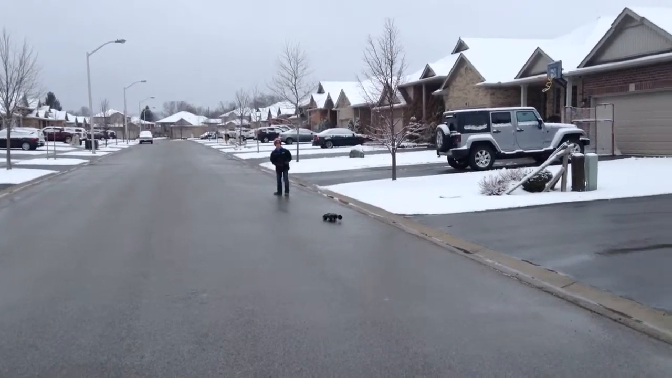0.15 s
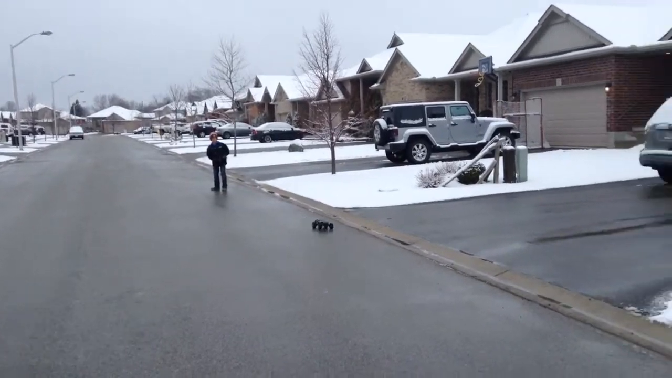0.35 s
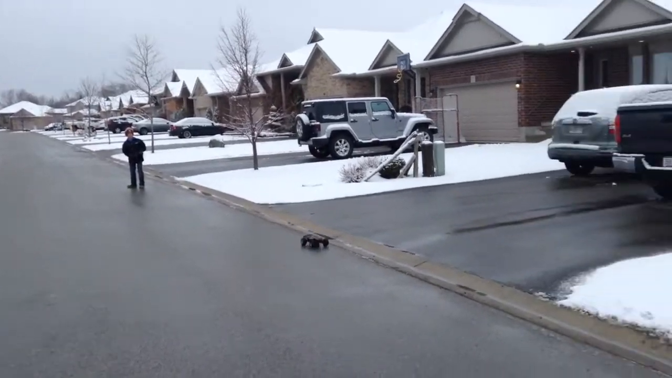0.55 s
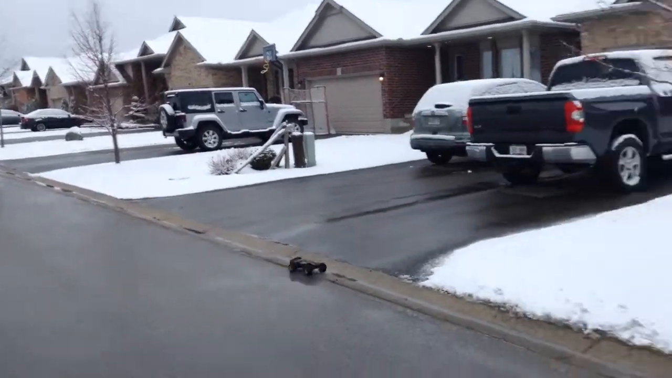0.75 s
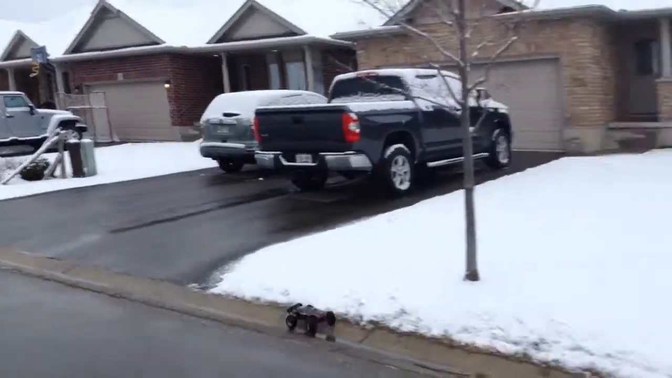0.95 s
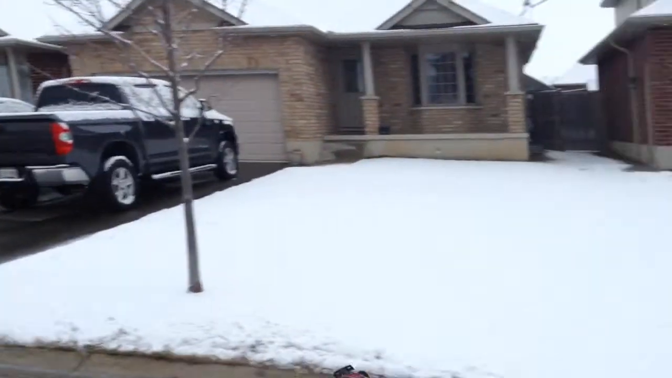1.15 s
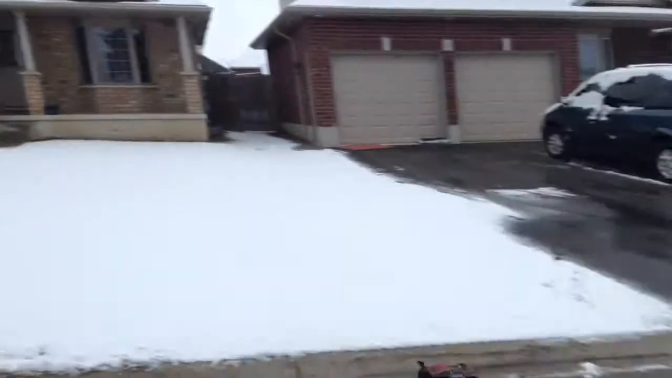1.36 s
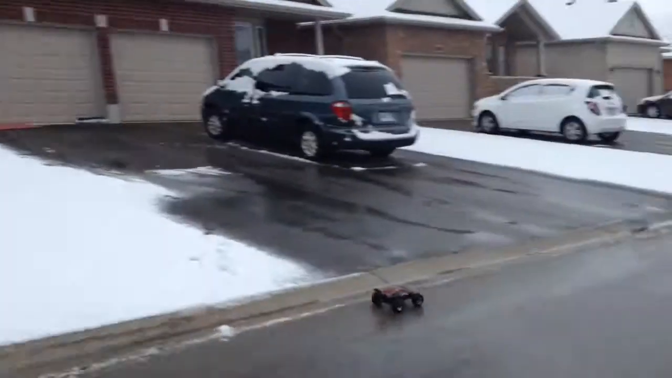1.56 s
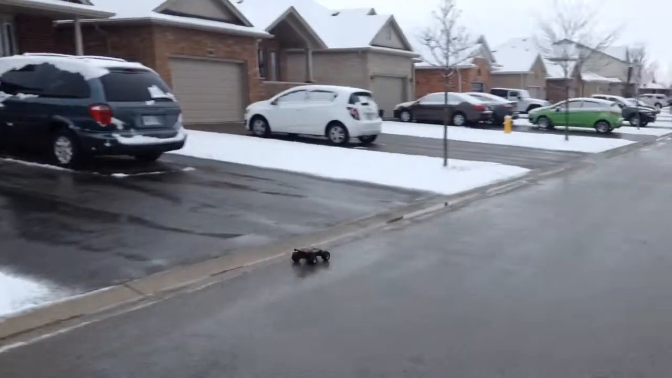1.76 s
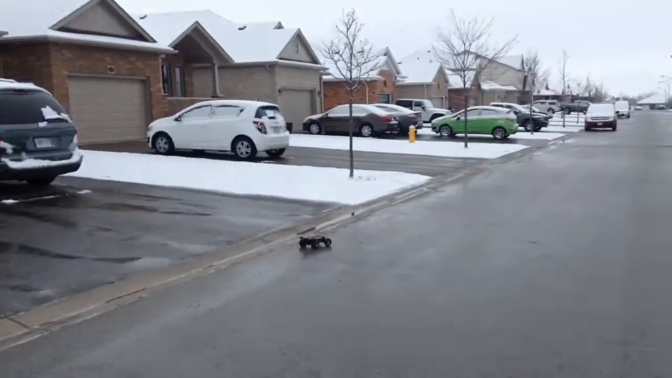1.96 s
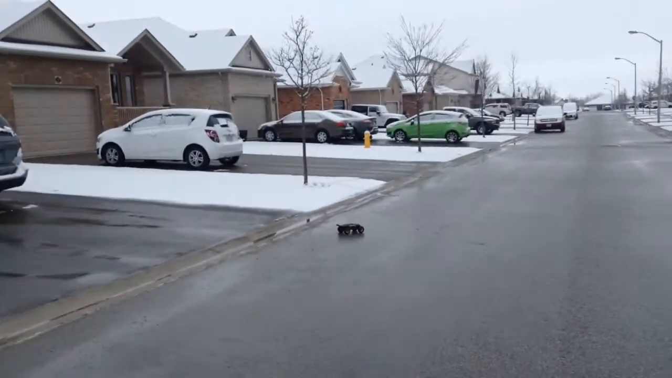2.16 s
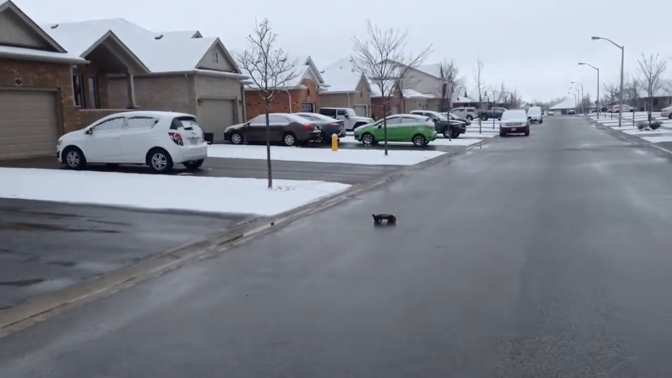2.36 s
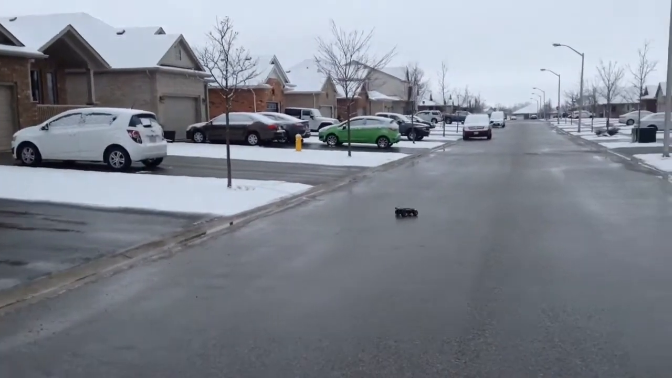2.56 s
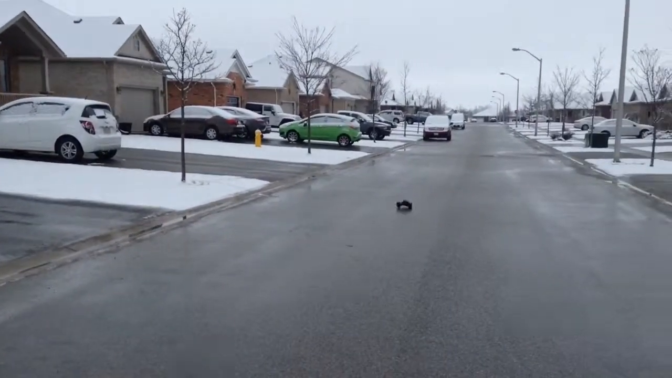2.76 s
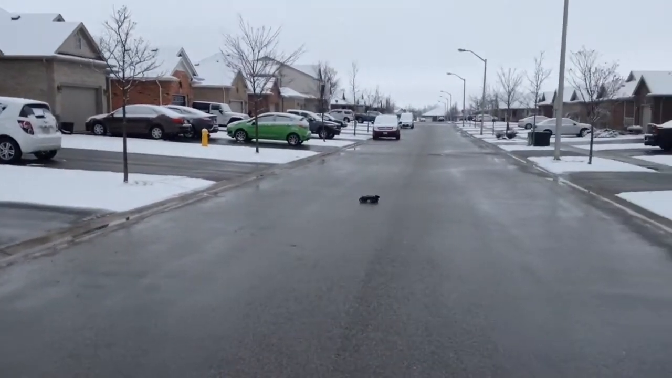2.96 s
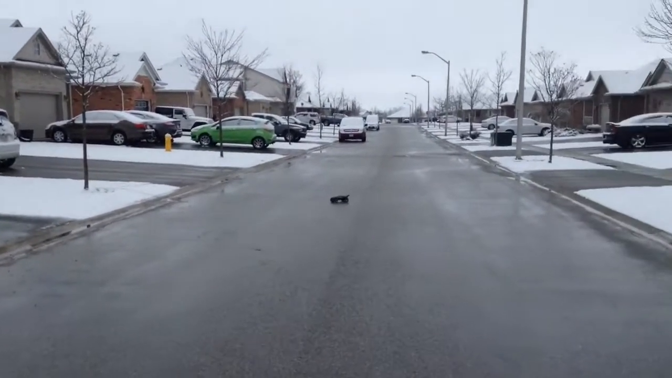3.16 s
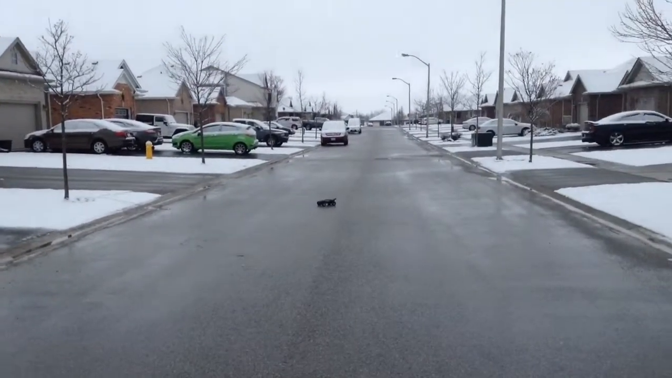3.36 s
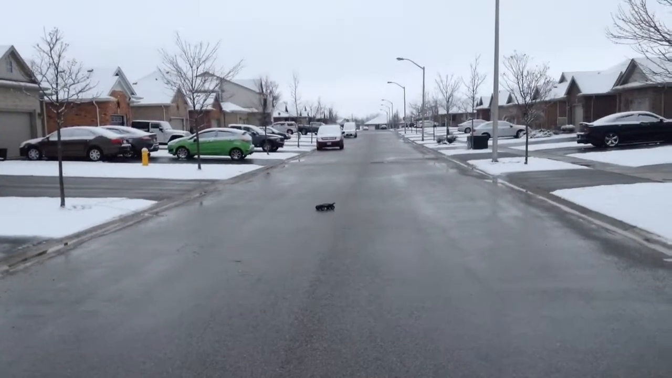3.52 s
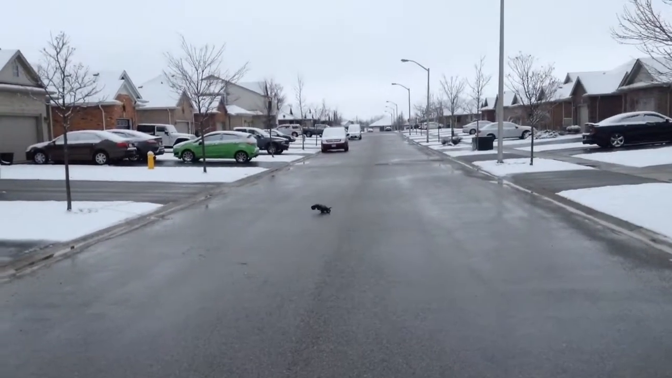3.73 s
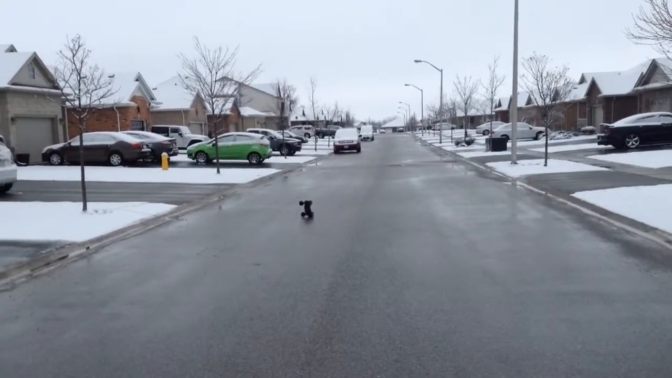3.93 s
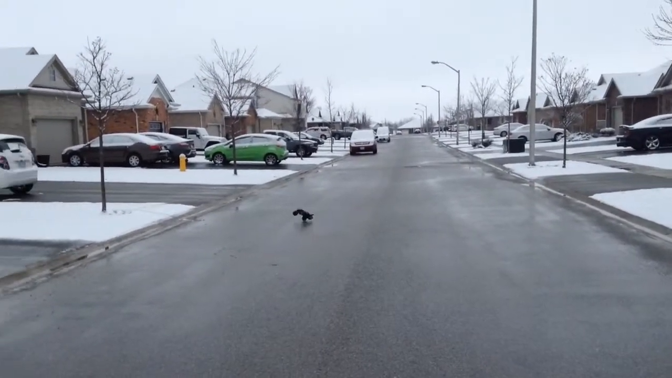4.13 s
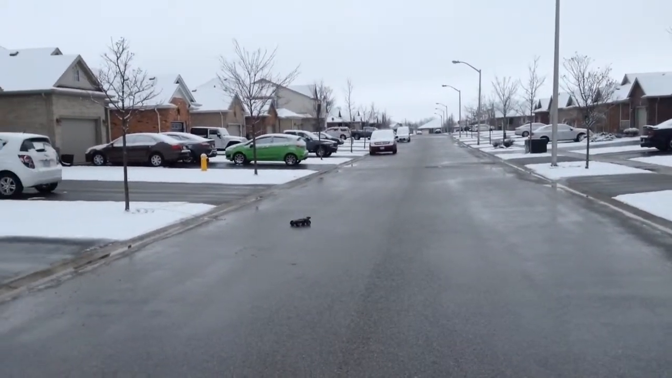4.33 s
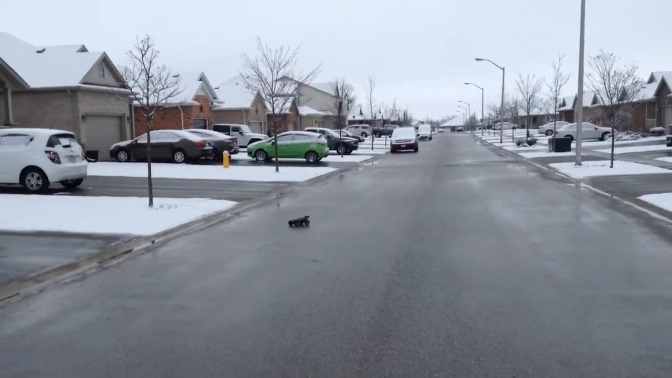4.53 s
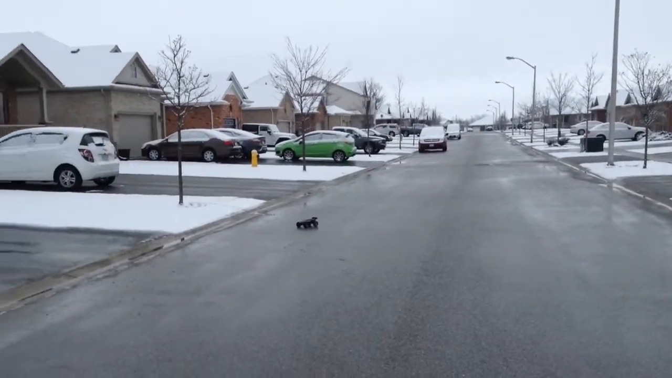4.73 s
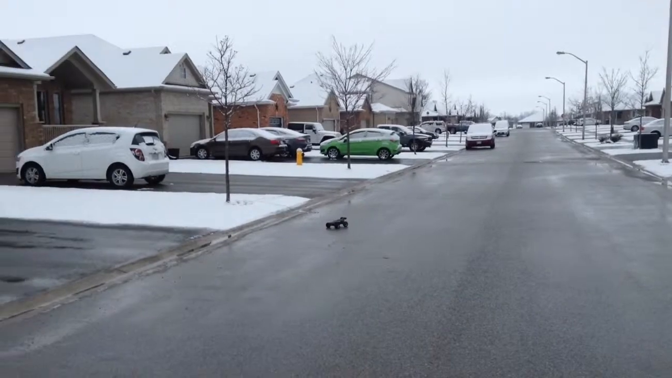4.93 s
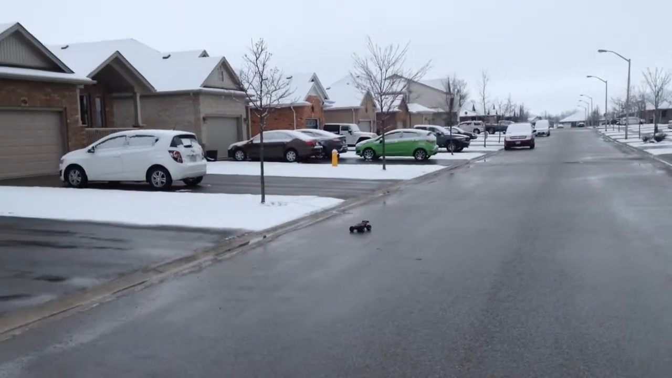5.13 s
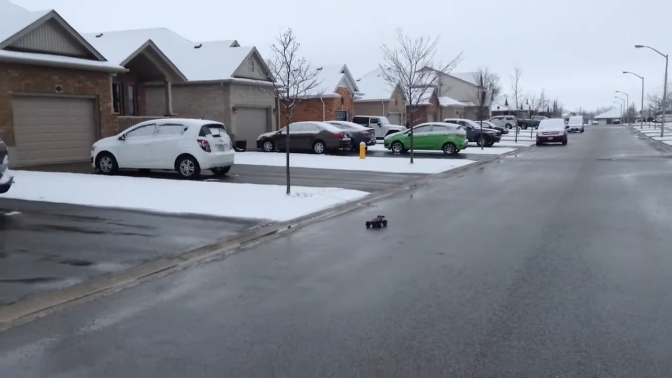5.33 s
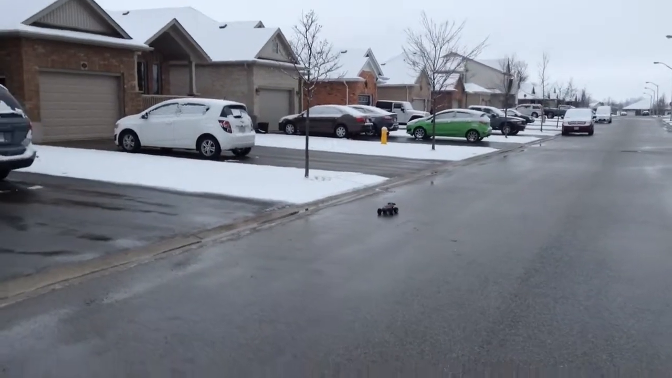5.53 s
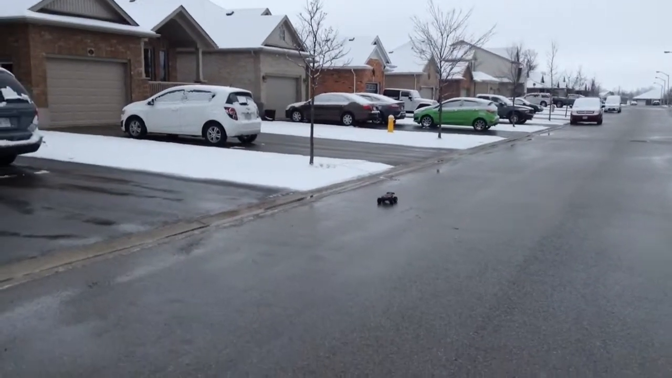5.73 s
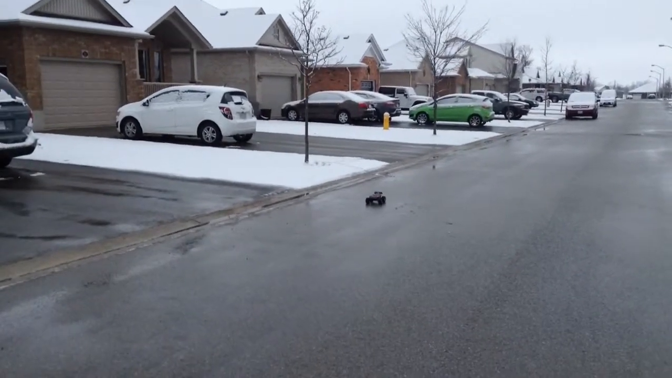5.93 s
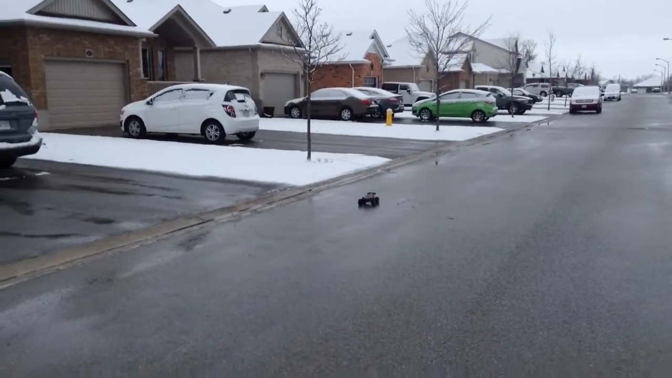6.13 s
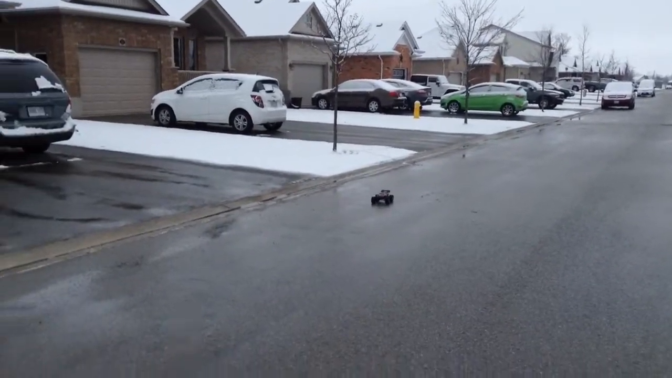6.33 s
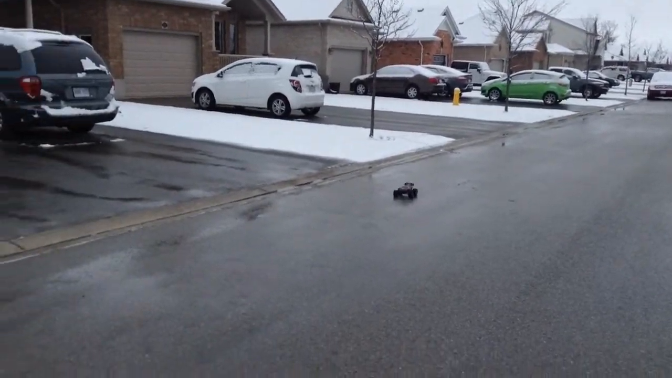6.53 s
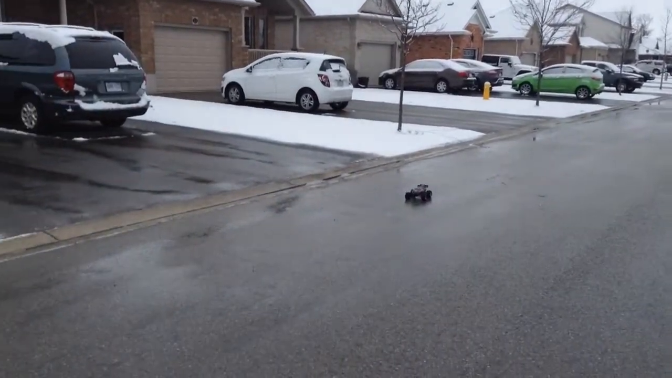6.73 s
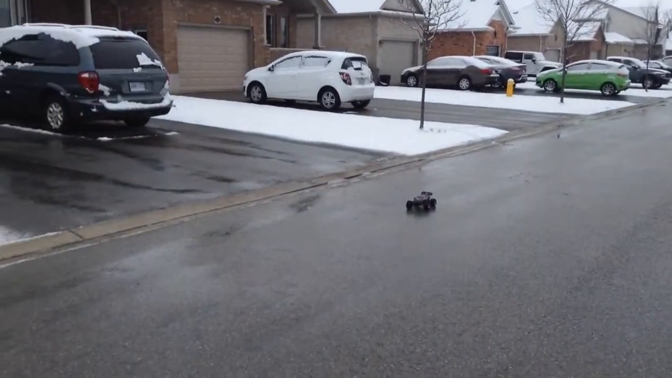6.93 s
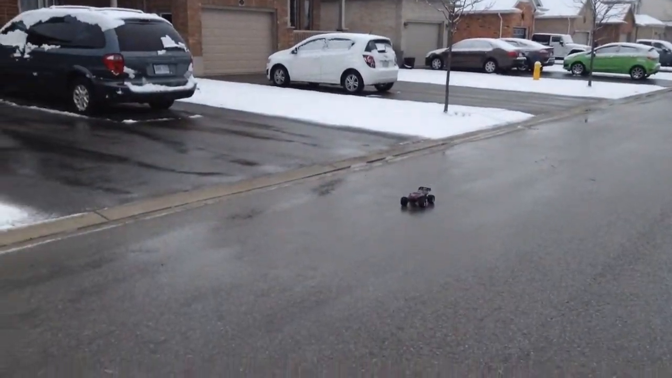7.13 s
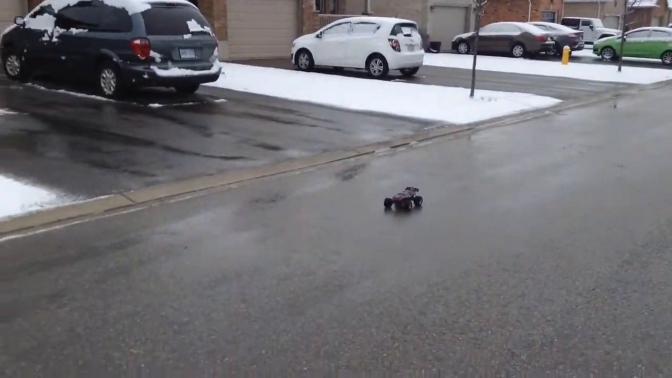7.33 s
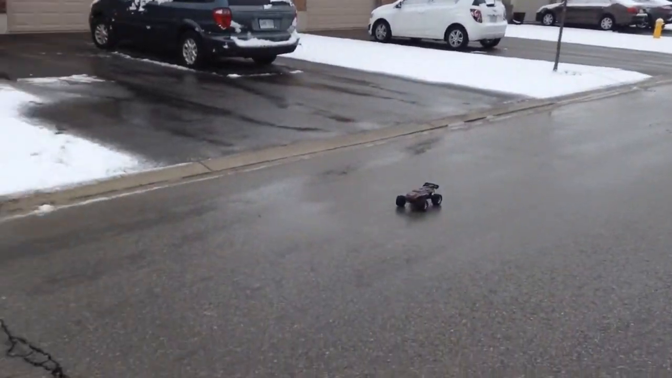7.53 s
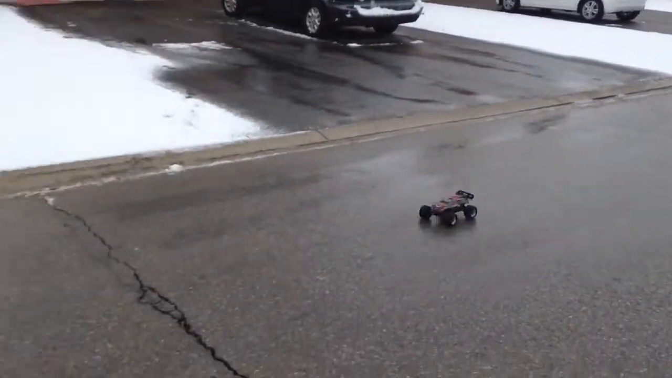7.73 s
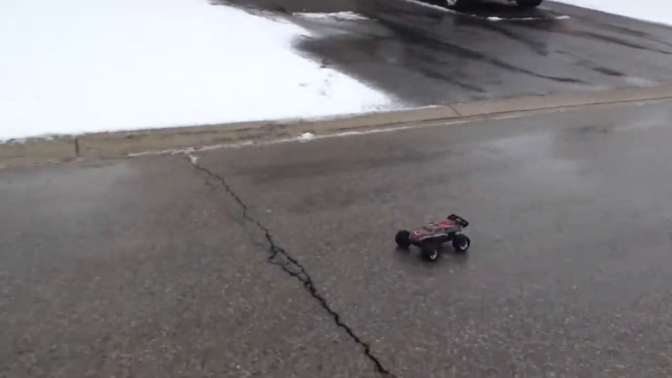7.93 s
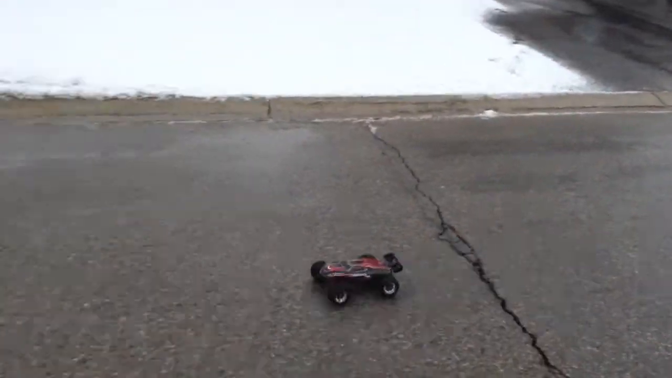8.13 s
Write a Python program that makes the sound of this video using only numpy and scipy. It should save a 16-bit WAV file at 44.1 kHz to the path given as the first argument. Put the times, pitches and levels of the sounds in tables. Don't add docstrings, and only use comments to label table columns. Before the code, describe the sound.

On a quiet snowy street, a small electric toy truck approaches with a high gear whine, plastic rattle and tyre hiss, and rushes past close with knocks and a wind thump. It coasts away, whine sinking, nearly silent. A sharp motor burst and thud follow, faint squeaks and ticks, then it races back with rising pitch, ending loud. Small mono microphone, little bass.

```python
import sys
import numpy as np
from scipy import signal
from scipy.fft import rfft, irfft
from scipy.io import wavfile
from scipy.ndimage import uniform_filter1d

SR = 44100
rng = np.random.default_rng(int(sys.argv[2]) if len(sys.argv) > 2 else 0)


def to_linear_factor(level_db):
    exponent = np.asarray(level_db, float) / 20
    return 10 ** exponent


def to_wav(sig):
    pcm = np.clip(np.atleast_2d(sig), -1, 1) * 32767
    pcm = np.round(pcm).astype(np.int16)
    wavfile.write(sys.argv[1], SR, pcm.T)


N = 360738

RATIO = 2.75
MOTOR_ORDERS = [1, 2, 3, 4]
# (level at the knee pitch [dB], slope below it [dB/octave],
# slope above it [dB/octave], blur factor)
MOTOR_SHARES = [(0, 0, 0, 1), (-1, 1.5, -15, 1.1), (-3, -2, -26, 1.3), (-3, 0, -26, 1.3)]


def evened(x):
    return x / np.sqrt(np.mean(abs(x) ** 2) + 1e-20)


def read(points, hz):
    f, value = np.transpose(points)
    return np.interp(np.log(hz + 1), np.log(f + 1), value, -99, -99)


def add(mix, s, sound):
    part = mix[round(s * SR):][:len(sound)]
    part += sound[:len(part)]


def between(t, start, end, size):
    return uniform_filter1d(1. * (t > start) * (t < end), size=size)


def around(t, middle, half):
    return np.exp(-((t - middle) / half) ** 4)


def drift(count, hz):
    r = np.exp(-np.pi * hz / SR)
    chance = rng.standard_normal((count, 2)) @ [1, 1j]
    return evened(signal.lfilter([1], [1, -2 * r, r * r], chance))


def hiss(shape_db, patchy_db):
    a, b, patches = rng.standard_normal((N // 128 + 5, 257, 3)).T
    patches = uniform_filter1d(patches, size=6, axis=0)
    patches = evened(uniform_filter1d(patches, size=16, axis=1))
    z = (a + 1j * b) * to_linear_factor(shape_db[:, None] + patchy_db * patches)
    return evened(signal.istft(z, nperseg=512, noverlap=384)[1][:N])


def bumps(rows, length, octaves, trim_db):
    out, hz, t = np.zeros(N), np.fft.rfftfreq(4096, 1 / SR), np.arange(4096) / SR
    u = t / length
    swell = np.tanh(3 * u) * np.exp(-u ** 2)
    for (s, db, f), noise in zip(rows, rng.standard_normal((len(rows), 4096))):
        band = np.exp(-(np.log2((hz + 9) / f) / octaves) ** 2 - (hz / 11000) ** 4)
        puff = evened(irfft(rfft(noise) * band))
        add(out, s - 0.1 * length, to_linear_factor(db + trim_db) * puff * swell)
    return out


def street():
    # (frequency [Hz], level [dB per Hz])
    wash_shape = [(24, -54), (40, -21.5), (234, 1.5), (323, -31), (632, -30), (873, -4), (1040, -22),
                  (1890, -13.5), (2250, -2), (3880, -20.5), (4390, -17.5), (5500, -20.5), (15200, -27)]
    hum_hz, hum_db = 241, -75
    wash_db = -73 + 2.7 * drift(N, hz=24.9).real
    wash = hiss(read(wash_shape, np.fft.rfftfreq(512, 1 / SR)), patchy_db=5.5) * to_linear_factor(wash_db)
    return wash + to_linear_factor(hum_db) * np.sin(2 * np.pi * hum_hz * np.arange(N) / SR)


def wind():
    # (time [s], peak [dB], centre [Hz])
    puffs = [(1.104, -15.5, 220), (1.584, -34, 207), (1.615, -30, 153), (1.689, -23.5, 187),
             (3.52, -52, 120), (3.552, -58, 150), (4.33, -58.5, 240.4), (4.985, -56.5, 260),
             (5.92, -45, 290), (5.957, -39, 282), (6.645, -57, 190), (6.69, -49, 300), (7.331, -59, 90),
             (8.15, -26, 299)]
    return bumps(puffs, .011, octaves=.6, trim_db=-5)


def shell(hz):
    # (centre [Hz], width [Hz], gain [dB])
    body = [(534, 67, 8), (950, 280, 3.5), (1550, 160, 4.5), (1958, 120, 5.5), (3544, 120, 2.5),
            (4760, 1700, 5), (5910, 210, 1)]
    return sum(db / (1 + (2 * (hz - f) / width) ** 2) for f, width, db in body)


def rolling_levels(t):
    # (time [s], wheel speed as heard [dB], weight on the road as heard [dB])
    roll_past = [(0.0, -31, -38), (0.25, -26, -37.5), (0.55, -23.5, -35), (0.98, -18.5, -27),
                 (1.13, -14, -27), (1.165, -21, -32.5)]
    roll_away = [(1.298, -26, -22.5), (1.8, -31, -37.5), (2.3, -36.5, -36.5), (2.65, -44.5, -41),
                 (2.98, -41, -39.5), (3.14, -52, -43.5), (3.27, -64, -53.5), (3.36, -85, -53)]
    roll_burst = [(3.6, -100, -61), (3.62, -64, -55.5), (3.75, -35.5, -45.5), (3.9, -28.5, -39),
                  (4.025, -32, -24), (4.055, -39.5, -31), (4.23, -56, -54), (4.5, -61, -50.5),
                  (5.1, -66.5, -52)]
    roll_back = [(5.66, -74.5, -56.5), (5.69, -55.5, -53), (5.99, -38, -46.5), (6.97, -39, -42),
                 (7.29, -30.5, -39.5), (7.61, -20.5, -36), (7.9, -20, -30.5), (8.18, -15.5, -23.5)]
    # (middle [s], half length [s], wheels [dB], road [dB], rattle
    # [dB])
    swells_and_dips = [(0.874, 0.027, 3.5, 1.5, -2), (1.088, 0.029, 1, 3.5, -0.5), (1.239, 0.032, 6.5, -2, 2.5),
                       (1.347, 0.071, 4, -5.5, -0.5), (1.455, 0.023, 0.5, -2.5, 0), (1.971, 0.13, 1, 2.5, -1),
                       (3.75, 0.092, 2.5, 4, -0.5), (4.001, 0.039, 2, -2, 5), (4.267, 0.03, 9.5, 11.5, 1.5),
                       (4.336, 0.057, 5, 5.5, -2.5), (5.94, 0.028, -0.5, 10, -1), (6.674, 0.073, 1, 1.5, 1),
                       (3.91, 0.0062, -4, 5, -7), (8.0, 0.17, 1, -1.5, -2), (7.355, 0.45, 0.5, -0.5, -3.5),
                       (5.76, 0.039, 0, -3, 5), (1.055, 0.076, 1.5, -0.5, 0), (1.168, 0.0082, -6.5, 4, -2.5),
                       (1.198, 0.0074, -7, -1, -2.5), (3.373, 0.046, 0, -2.5, -1), (4.565, .035, 6.5, -0.5, -2),
                       (4.61, .014, -1.5, -0.5, -5), (4.755, 0.016, -3, -2.5, -6), (5.255, 0.024, -6, -3.5, -2),
                       (5.345, .015, -3.5, -3, -1), (5.485, 0.019, -4, -1.5, -3), (5.54, 0.023, -3, -1, 4),
                       (7.72, 0.23, -0.5, 1, -4.5)]
    s, *levels = np.transpose(roll_past + roll_away + roll_burst + roll_back)
    swells_db = sum(np.outer(db, around(t[::50], at, half)) for at, half, *db in swells_and_dips)
    swells_db = swells_db.repeat(50, axis=1)[:, :N]
    spray_db, tyres_db = np.array([np.interp(t, s, level) for level in levels]) + swells_db[:-1]

    rattle_db = -38 + 0.54 * (spray_db + 37.5) + 0.14 * (tyres_db + 43.5) + swells_db[-1]
    rattle_db += -4.5 * around(t, 3.25, 0.25)

    away = between(t, 1.15, 3.25, size=6000)
    rumble_db = -53.5 + 1.15 * (tyres_db + 42.0) - 0.0254 * (spray_db + 40.5) + 4 * away
    rumble_db += -5.5 * between(t, 3.64, 4.1, size=2000)
    rumble_db += -0.5 * around(t, 6.9, 0.26)
    rumble_db -= 1.5 * np.maximum(-50 - tyres_db, 0)

    fizz_db = spray_db - 8.0 + 0.16 * (spray_db + 15.0) + 1.5 * away * (2.7 - t)
    return spray_db, tyres_db, rattle_db, rumble_db, fizz_db


def chassis_rumble(t, shell_db):
    # (frequency [Hz], level [dB per Hz])
    rumble_shape = [(65, -66), (110, -45.5), (181, -11.5), (344, -6.5), (478, -16.5), (535, 5.5), (750, -9),
                    (980, -34.5), (1650, -120)]
    boom_db, thin_db = 4.5, -3
    rumble = hiss(read(rumble_shape, np.fft.rfftfreq(512, 1 / SR)) + .7 * shell_db, patchy_db=1.8)
    rumble = signal.sosfilt(signal.butter(4, 150, "high", fs=SR, output="sos"), rumble)
    low = signal.sosfilt(signal.butter(2, 370, fs=SR, output="sos"), rumble)
    booming = between(t, .45, 2.25, size=8000)
    return rumble - low + low * to_linear_factor(thin_db + (boom_db - thin_db) * booming)


def rolling():
    # (frequency [Hz], level [dB per Hz])
    rattle_shape = [(1290, -8.5), (2200, -3.5), (2440, -4), (3890, -1.5), (5360, -8), (6000, -25),
                    (7800, -40.5), (13200, -120)]
    tyre_shape = [(440, -30), (750, -1), (1040, 0), (1500, -1), (1690, -8), (2250, -10), (2400, -23),
                  (3120, -12.5), (5280, -120)]
    spray_shape = [(3290, -17), (5600, -3), (6230, -0.5), (7150, -1.5), (7980, -2), (10000, -10),
                   (13000, -41.5), (22000, -120)]
    fizz_shape = [(5590, -35.5), (9500, -1.5), (11100, -1), (13300, -4), (14500, -11.5), (15200, -10)]
    hz, t = np.fft.rfftfreq(512, 1 / SR), np.arange(N) / SR
    shell_db = shell(hz)
    spray_db, tyres_db, rattle_db, rumble_db, fizz_db = rolling_levels(t)

    slow = np.clip((-46 - rattle_db) / 8, 0, 1) * (t > 3.4)
    jolt_db = 1.3 * drift(N, hz=45).real + 2.3 * slow * drift(N, hz=22.2).real
    grit_db = 2.0 * drift(N, hz=900).real

    rattle = hiss(read(rattle_shape, hz) + shell_db, patchy_db=1.0)
    tyres = hiss(read(tyre_shape, hz) + shell_db, patchy_db=2.5)
    spray = hiss(read(spray_shape, hz) + shell_db, patchy_db=2.5)
    fizz = hiss(read(fizz_shape, hz), patchy_db=3.5)
    out = rattle * to_linear_factor(rattle_db - 4.0 + jolt_db + grit_db)
    out += tyres * to_linear_factor(tyres_db - 6.5 + 0.95 * jolt_db)
    out += chassis_rumble(t, shell_db) * to_linear_factor(rumble_db - 2.0 + 0.11 * jolt_db)
    out += spray * to_linear_factor(spray_db - 4.5 + 1.0 * jolt_db + grit_db)
    return out + fizz * to_linear_factor(fizz_db + 1.1 * jolt_db + grit_db)


def chassis_hits():
    # (time [s], peak [dB], centre [Hz])
    knocks = [(0.8694, -12, 4390), (1.1772, -14, 4650), (1.1894, -16, 4870), (1.2344, -25, 4500),
              (1.3443, -11.5, 6180), (2.1394, -22.5, 5050), (1.4965, -17, 6300), (2.2229, -27, 4840),
              (2.2667, -34, 4650), (2.2837, -21, 4740), (2.5551, -25.5, 4150), (2.606, -24, 5320),
              (2.6484, -24.5, 3950), (3.1038, -34.5, 4160), (3.6203, -34.5, 2944), (3.9175, -14, 5230),
              (3.9744, -23, 4500), (4.1604, -28, 5850), (4.3146, -25.5, 4960), (4.4343, -33.5, 4310),
              (4.7087, -45, 4850), (4.7818, -47, 3000), (5.5121, -47, 2200), (5.674, -45, 5000),
              (5.685, -38.5, 4500), (6.657, -24, 2200), (6.69, -23, 3080)]
    ticks = [(1.2167, -15.5, 4200), (1.255, -17.5, 2030), (3.918, -30, 5480), (3.938, -18, 4000),
             (3.951, -27, 3500), (3.978, -24.5, 4000), (6.677, -29, 3000), (3.2834, -56.5, 3600),
             (3.2934, -48, 4160), (3.614, -55, 4500), (5.0062, -35, 4600), (5.0619, -48, 4520),
             (5.085, -36, 3960), (5.0914, -36, 4200), (5.2848, -51, 5200), (5.2954, -42.5, 3610),
             (5.321, -51.5, 4500), (5.3844, -47, 3600)]
    thuds = [(1.247, -33, 726), (3.617, -26, 1070), (3.993, -6.5, 900), (4.099, -19.5, 900),
             (4.252, -34, 940), (5.0, -38, 1080), (5.922, -28, 576), (5.959, -29, 283), (6.638, -24, 1100),
             (6.655, -24, 950), (6.68, -29, 550), (8.099, -10, 980)]
    # (time [s], peak [dB], centre [Hz])
    squeaks = [(3.285, -67, 1050), (3.305, -67, 985), (3.31, -76, 4850), (3.32, -76, 2140),
               (3.33, -67.5, 1520), (3.37, -69, 1480), (3.345, -80.5, 4410), (3.415, -70, 1050),
               (3.425, -75, 2230), (3.415, -80, 4430), (3.49, -65, 1000), (3.495, -72.5, 2210),
               (3.5, -86, 4440), (5.015, -58, 1137), (5.105, -64, 1484), (5.18, -62.5, 1430),
               (4.37, -59, 1550), (4.53, -62, 5000), (4.55, -64.5, 3500), (4.56, -59, 993),
               (4.7, -66.5, 2100), (5.34, -63, 1170), (5.4, -64, 1510), (5.45, -68, 1900), (5.5, -67, 1504),
               (5.52, -64, 1127)]
    rings = [(0.84, -39, 1500), (0.94, -40, 2000), (1.0, -42, 2150), (1.04, -38, 1613), (1.05, -41, 2160),
             (1.09, -38, 2155), (1.32, -44, 1140), (1.36, -39, 1047), (1.4, -46, 1000), (3.772, -49, 2330),
             (3.8, -49, 2300), (3.838, -45, 2210), (3.872, -46, 2180), (3.93, -44, 2580)]
    out = bumps(knocks, .012, octaves=1.28, trim_db=-9.0)
    out += bumps(ticks, .0015, octaves=.9, trim_db=-1)
    out += bumps(squeaks + rings, .04, octaves=.05, trim_db=8)
    return out + bumps(thuds, 0.0299, octaves=0.42, trim_db=-18.0)


def controller():
    # (start [s], length [s], level [dB], share spent fading)
    part_throttle = [
        (3.632, .06, -53, .3),
        (5.675, .55, -57, .2),
        (6.2, 1.35, -48, .6),
        (7.5, .3, -36, .7),
    ]
    switch_hz = 5960
    turn = 2j * np.pi * switch_hz * np.arange(N) / SR
    tone = 0.7 * np.exp(turn / 2) + np.exp(turn) + .08 * np.exp(2 * turn)
    tone = tone * (.4 + drift(N, hz=160))
    gate = np.zeros(N)
    for s, length, db, fading in part_throttle:
        fade = signal.windows.tukey(round(length * SR), np.clip(fading, 0, 1))
        add(gate, s, to_linear_factor(db) * fade)
    return tone.real * gate


def whine(rows, orders, shares, knee_hz, to_motor, rough, fuzz_hz, throb, wobble):
    # (frequency [Hz], gain [dB])
    overtones = [(500, -14), (5500, -6), (6000, 7), (7000, 4.5), (7600, -6.5), (9000, -28), (12000, -9.5),
                 (16000, -33.5)]
    shudder_hz, shudder_width_hz, shudder_floor = 5350, 850, .4
    s, hz, level, load = np.transpose(rows)
    t = np.arange(s[0], s[-1], 1 / SR)
    hz = np.interp(t, s, hz)
    octaves = np.log2(hz / knee_hz)
    mesh = 2 * np.pi * np.cumsum(hz * to_motor) / SR

    turn = 2 * np.pi * 44 * t + .5 * drift(len(t), hz=12).real
    jitter = .007 * drift(len(t), hz=70).real
    nearness = np.exp(-((hz - shudder_hz) / shudder_width_hz) ** 2)
    shudder = shudder_floor + (1 - shudder_floor) * nearness
    pinion = np.cos(mesh / 26)
    beat = (1 + throb * np.cos(turn)) * (1 + 2 * throb * shudder * pinion)
    slip = np.sin(turn) - np.sin(2 * turn) / 2 + np.sin(3 * turn) / 3
    phase = 2 * np.pi * np.cumsum(hz * (1 + jitter - wobble * slip * shudder)) / SR

    out, grid = np.zeros(len(t)), np.arange(0, SR / 2, 20)
    shell_db = shell(grid)
    for k, (db, below_db, above_db, blur) in zip(orders, shares):
        fuzz = drift(len(t), fuzz_hz * np.sqrt(k) * blur)
        tone = np.exp(1j * k * phase) * (1 - rough + rough * fuzz)
        tone *= to_linear_factor((2.6 if k > 1 else 1.5) * drift(len(t), hz=14).real)
        level_db = np.interp(t, s, level + (k > 1) * load) + db
        level_db += np.where(octaves < 0, below_db, above_db) * octaves
        level_db += (k >= 3) * read(overtones, k * hz)
        level_db += 0.23 * np.interp(k * hz, grid, shell_db) - 3.5
        out += np.sqrt(2) * evened(tone * beat).real * to_linear_factor(level_db)
    return s[0], out * signal.windows.tukey(len(t), 0.0092 / (s[-1] - s[0]))


def passing_gears(out):
    # (time [s], pitch [Hz], level [dB], tooth load [dB])
    passing = [(0.0, 3430, -29, -2.5), (0.128, 3547, -28.5, -3.5), (0.19, 3950, -34, 8),
               (0.26, 4000, -36.5, 10), (0.335, 3680, -30, 2), (0.428, 3900, -30.5, 4.5),
               (0.5, 4030, -29.5, 2.5), (0.558, 4254, -38, 7), (0.63, 4106, -35, 11),
               (0.69, 4163, -30.5, 7), (0.8, 4345, -28, 6), (0.845, 4470, -24.5, 2), (0.875, 4394, -27, 3.5),
             (0.945, 4480, -36, 15), (1.0, 4824, -22, -0.5), (1.057, 5050, -17.5, -4.5),
             (1.1, 4945, -21, 0.5), (1.14, 4920, -28.5, 6), (1.2, 4530, -31.5, -3)]
    axle_orders = [1, 2, RATIO, RATIO / 2, RATIO]
    # (level at the knee pitch [dB], slope below [dB/octave], slope above [dB/octave], blur)
    axle_shares = [(0, 0, 0, .9), (0, 18, -10, 2.2), (-11, -6, -30, 2.8), (-7, -8, -30, 3.5),
                   (-6, -6, -30, 7)]
    add(out, *whine(passing, axle_orders, axle_shares, 4400, RATIO,
                    rough=.62, fuzz_hz=140, throb=.15, wobble=.006))


def coasting_gears(out):
    # (time [s], pitch [Hz], level [dB], tooth load [dB])
    coast = [(1.3, 6650, -33, .1), (1.4, 6410, -23.5, .1), (1.55, 6140, -28.5, .1), (1.72, 5900, -34, .1),
             (2.1, 5130, -72, .1), (2.3, 4860, -113, .1)]
    coast_orders = [1, 2 / RATIO, .16]
    # (level at the knee pitch [dB], slope below [dB/octave], slope above [dB/octave], blur)
    coast_shares = [(0.5, 300, -190, 0.89), (-16.5, -165, -40, 1.3), (-9.5, -2, -9.5, 1.2)]
    add(out, *whine(coast, coast_orders, coast_shares, 6150, 2,
                    rough=.85, fuzz_hz=300, throb=.3, wobble=.006))


def burst_gears(out):
    # (time [s], pitch [Hz], level [dB], tooth load [dB])
    spin_burst = [(3.655, 800, -47, -19), (3.682, 1330, -33.5, -12), (3.7, 2250, -44.5, 10),
                  (3.72, 2900, -38, 8.5), (3.735, 3200, -34, -1), (3.752, 4000, -33.5, 5),
                  (3.79, 5050, -27.5, -6),
                  (3.81, 4350, -42, 9), (3.823, 5050, -25.5, -4), (3.836, 5900, -24, -6),
             (3.847, 6280, -18, -12), (3.862, 5300, -21.5, -4), (3.874, 5690, -18.5, -8),
             (3.891, 6190, -17.5, -10), (3.899, 5750, -10, -7)]
    landing = [(3.915, 5180, -33, -15), (3.95, 5040, -33, -15), (4.0, 4440, -36, -15),
               (4.035, 4300, -26, -15)]
    add(out, *whine(spin_burst, MOTOR_ORDERS[:2], MOTOR_SHARES, 4000, 1,
                    rough=.5, fuzz_hz=240, throb=.25, wobble=.01))
    add(out, *whine(landing, MOTOR_ORDERS[:1], MOTOR_SHARES, 4000, 1,
                    rough=.8, fuzz_hz=250, throb=.4, wobble=.01))


def returning_gears(out):
    # (time [s], pitch [Hz], level [dB], tooth load [dB])
    brake = [(5.68, 2067, -51, -1), (5.691, 1850, -38, 2), (5.698, 1230, -46, -5.5), (5.707, 800, -48, -2)]
    pickup = [(5.71, 933, -41, -1), (5.745, 1085, -50, 0), (5.775, 1370, -45, 1), (5.85, 1713, -52.5, 8),
              (5.88, 1860, -39, 2), (5.91, 1914, -36, -7), (5.96, 2197, -46, 5.5), (6.03, 2424, -46, 5),
              (6.3, 2786, -47, -14), (6.95, 3356, -42, -18)]
    rush = [(7.15, 3604, -38.5, 2.5), (7.374, 4394, -34, 2.5), (7.5, 4733, -29, 1),
            (7.604, 5173, -26.5, -13), (7.68, 5418, -22.5, -4.5), (7.772, 5880, -15, -13),
            (7.858, 6070, -13.5, -2), (7.902, 6010, -17.5, 3)]
    finish = [(7.95, 6284, -19, -5), (7.985, 6374, -14, -14.5), (8.022, 6580, -25, -11),
              (8.05, 7160, -20, -10.5), (8.084, 7050, -19, -11), (8.116, 7060, -14, -6),
              (8.138, 6840, -22, -5.5), (8.18, 7290, -18, -12)]
    under_orders = [.5, 1 / RATIO, 2 / RATIO]
    # (level at the knee pitch [dB], slope below [dB/octave], slope above [dB/octave], blur)
    under_shares = [(1, 6, -4, 2), (-3, 16, -14, 1), (-18, 20, 40, 1.5)]
    # (time [s], level [dB])
    under_level = [(6.95, -54), (7.2, -46), (7.55, -39), (7.75, -33), (7.95, -33), (8.18, -30)]
    add(out, *whine(brake, MOTOR_ORDERS, MOTOR_SHARES, 4000, 0.92,
                    rough=0.83, fuzz_hz=149, throb=.2, wobble=.012))
    add(out, *whine(pickup[:-2], MOTOR_ORDERS, MOTOR_SHARES, 4000, 1,
                    rough=.6, fuzz_hz=150, throb=.3, wobble=.03))
    add(out, *whine(pickup[-3:] + rush[:1], MOTOR_ORDERS, MOTOR_SHARES, 4000, 1,
                    rough=.8, fuzz_hz=260, throb=.4, wobble=.04))
    add(out, *whine(rush + finish, MOTOR_ORDERS[:3], MOTOR_SHARES, 4000, 1,
                    rough=.52, fuzz_hz=200, throb=.45, wobble=.036))
    path = pickup[-1:] + rush + finish
    under = [(s, hz, np.interp(s, *np.transpose(under_level)), 0) for s, hz, *_ in path]
    add(out, *whine(under, under_orders, under_shares, 5300, 1,
                    rough=.62, fuzz_hz=150, throb=.2, wobble=.01))


def gears():
    out = np.zeros(N)
    passing_gears(out)
    coasting_gears(out)
    burst_gears(out)
    returning_gears(out)
    return out


def scene():
    truck = gears() + controller() + chassis_hits()
    t = np.arange(SR // 3) / SR
    houses = rng.standard_normal(len(t)) * to_linear_factor(-60 * t / .3) * (t > .012)
    wet = to_linear_factor(-15) * signal.oaconvolve(truck, houses / np.linalg.norm(houses))[:N]
    return np.tile(truck + wet + rolling() + street() + wind(), (2, 1))


def band_limit(x):
    return signal.sosfilt(signal.butter(12, 15380, fs=SR, output="sos"), x)


def record(dry):
    limited = 1.5 * np.tanh(dry / 1.5)
    mix = signal.sosfilt(signal.butter(3, 85, "high", fs=SR, output="sos"), limited)
    mix = mix + to_linear_factor(-76.0) * rng.standard_normal(N)
    return band_limit(mix)


dry = scene()
out = record(dry)
to_wav(out)
```